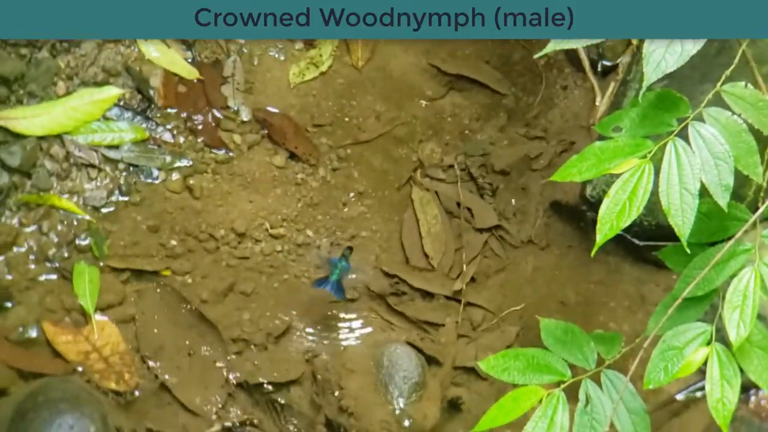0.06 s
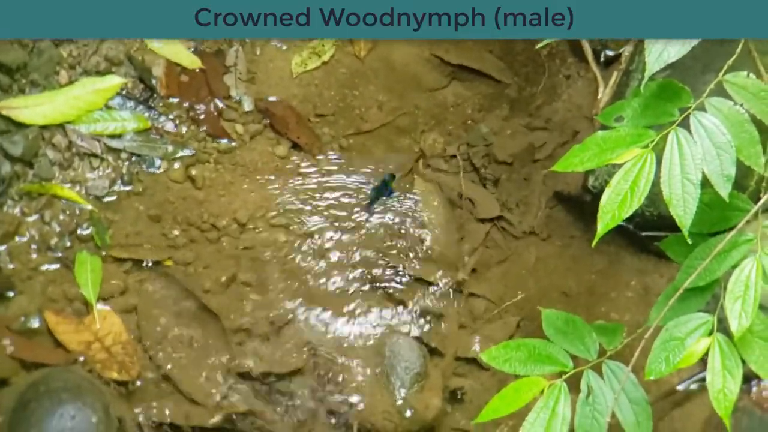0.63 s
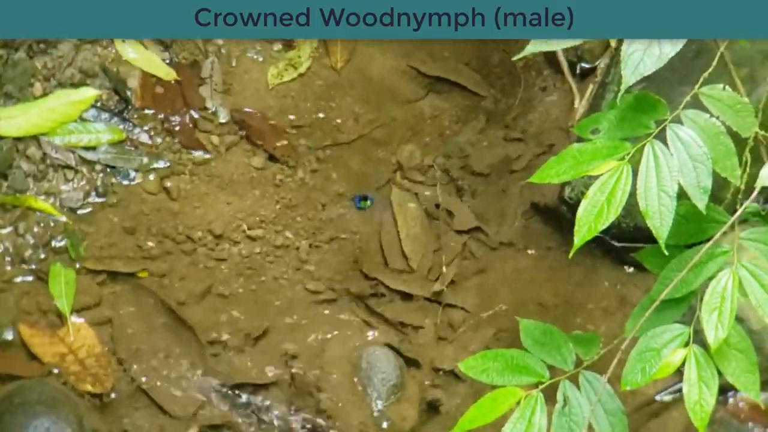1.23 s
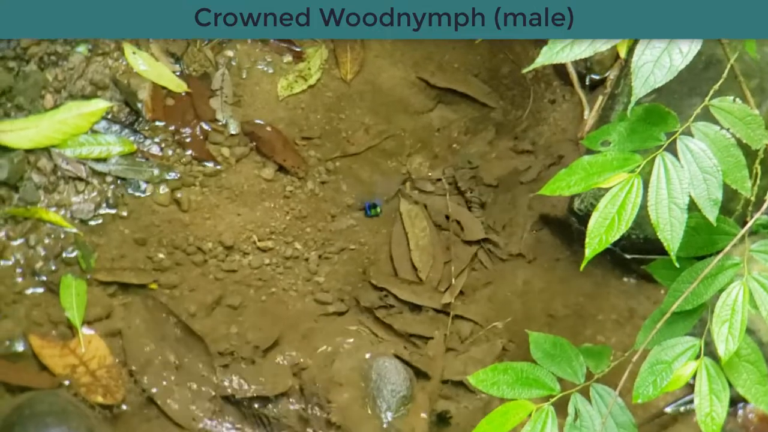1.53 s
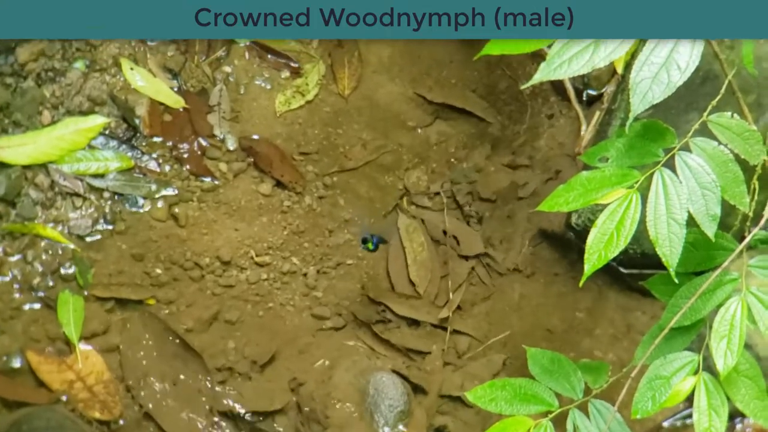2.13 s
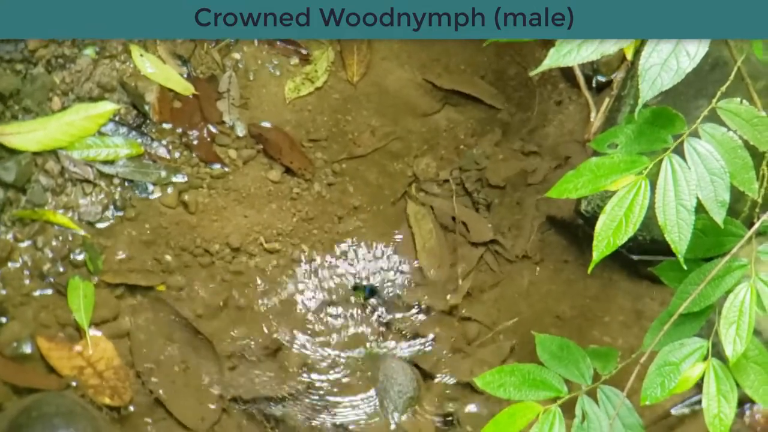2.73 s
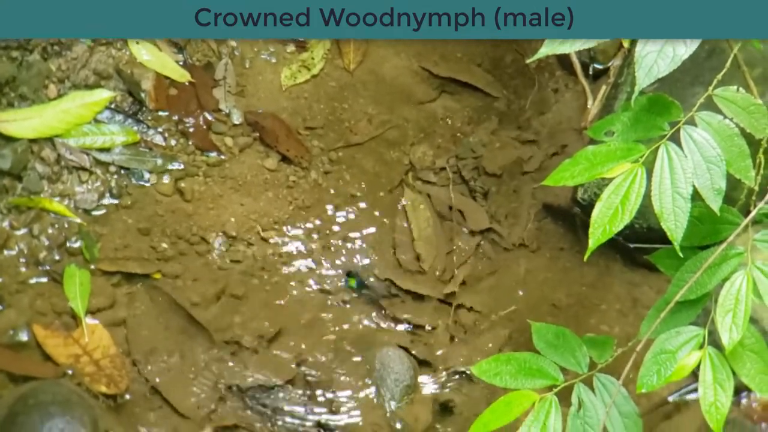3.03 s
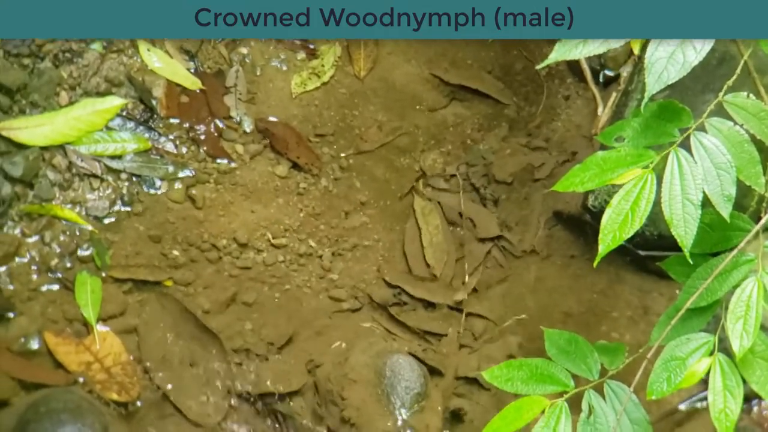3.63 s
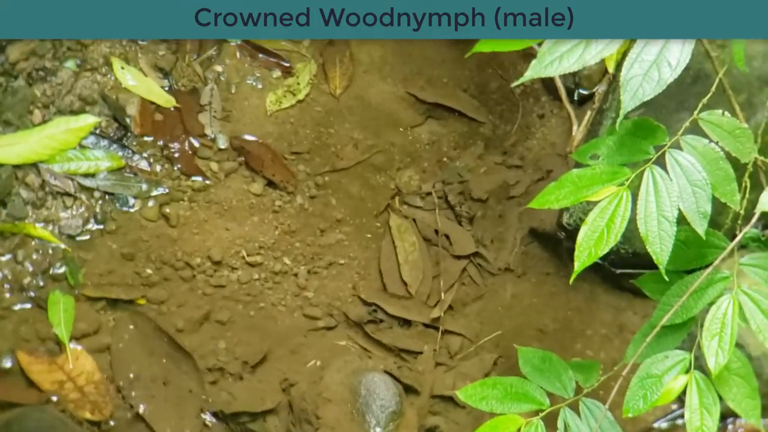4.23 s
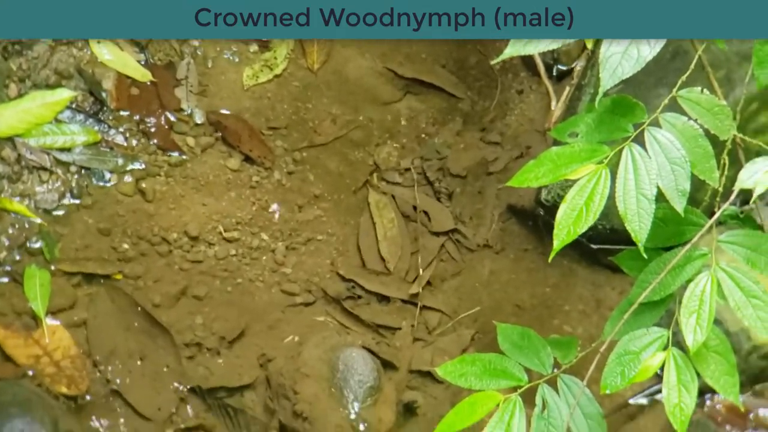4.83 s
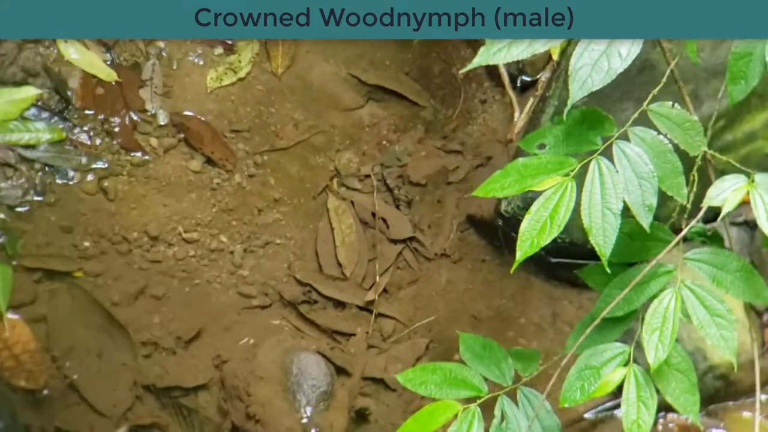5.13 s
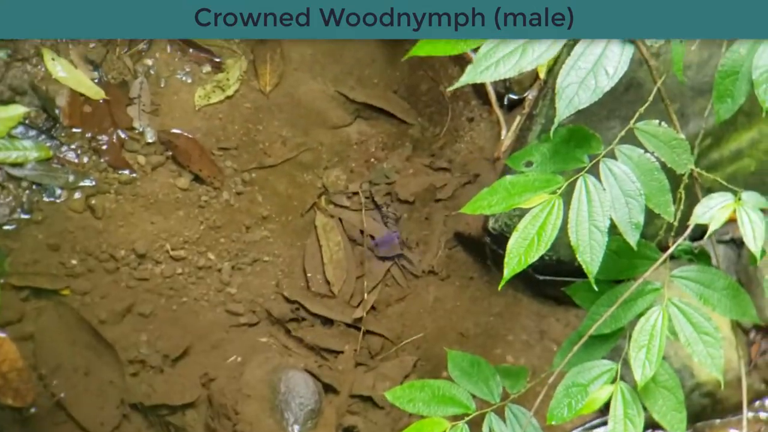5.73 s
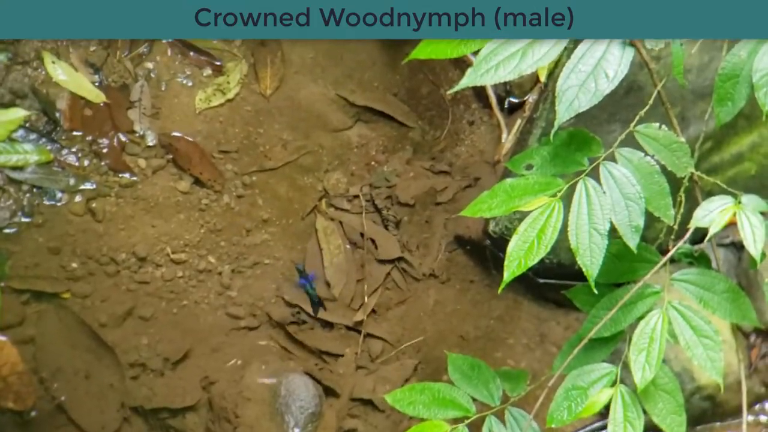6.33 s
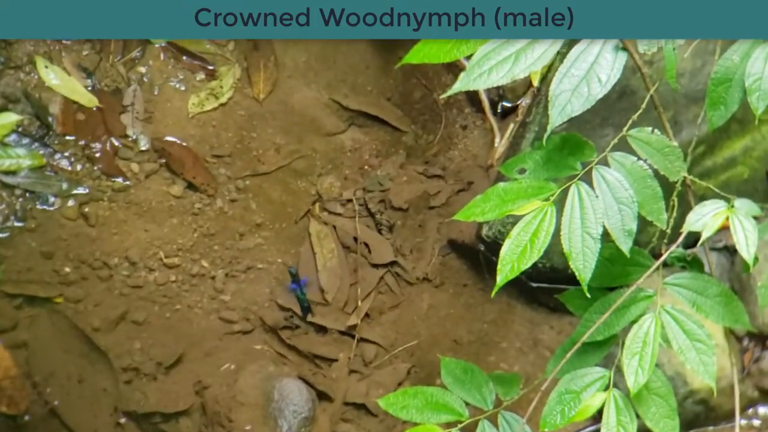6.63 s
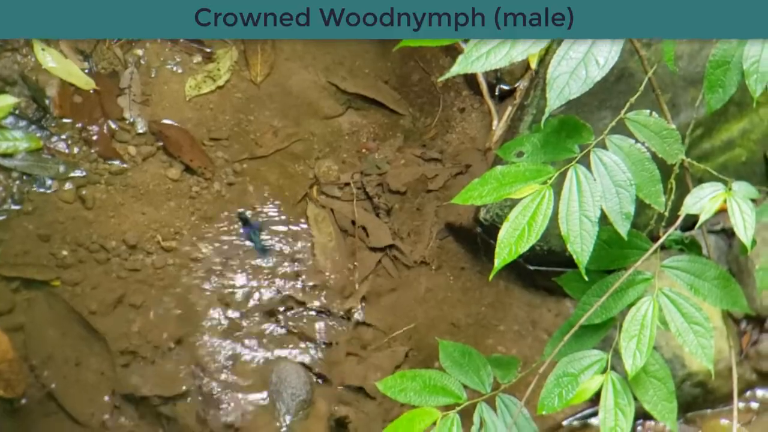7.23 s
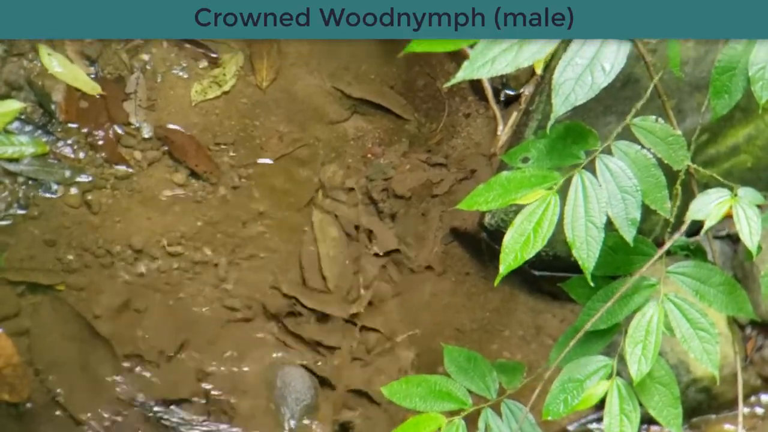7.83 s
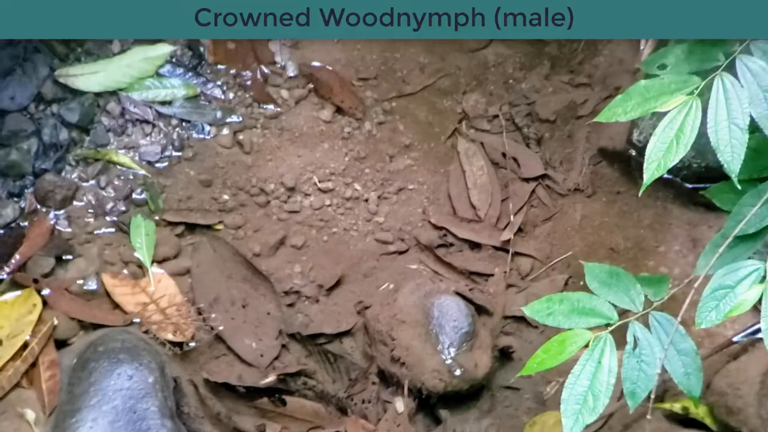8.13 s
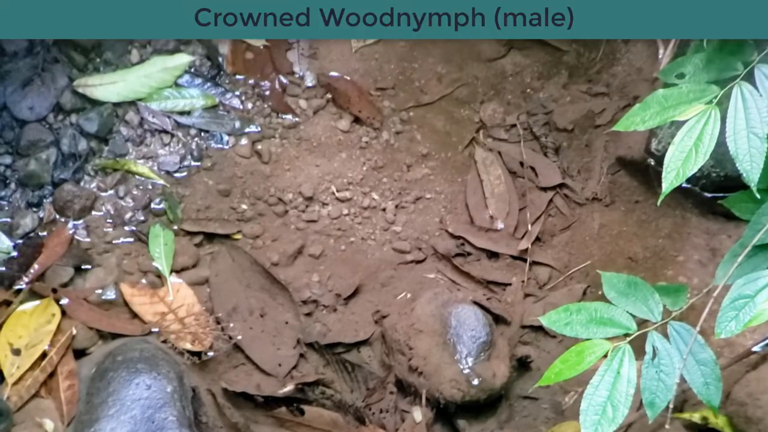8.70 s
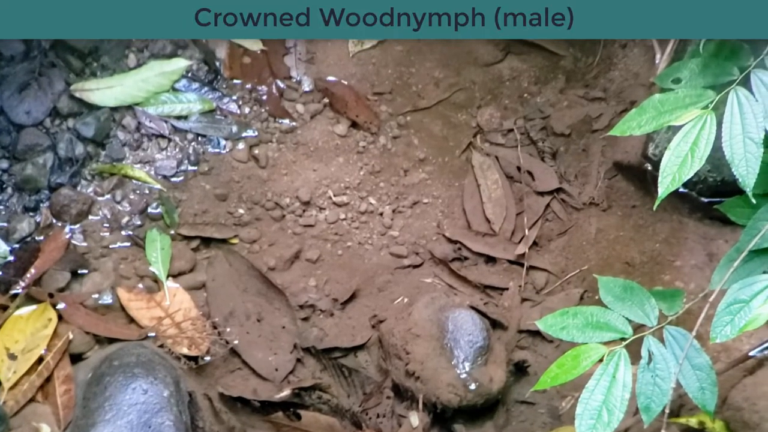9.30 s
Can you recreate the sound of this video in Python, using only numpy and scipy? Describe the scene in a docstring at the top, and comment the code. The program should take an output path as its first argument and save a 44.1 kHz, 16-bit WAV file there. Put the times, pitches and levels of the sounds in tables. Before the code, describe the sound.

In a tropical forest, a steady insect hiss and a fast pulsing katydid sit over gently running water, while birds whistle and peep. Drops land on the microphone with close, sharp ticks and knocks, and a light breeze rumbles on it. Halfway through, the sound switches to cicadas rising and falling in waves, then suddenly drops to a quiet far chorus with a cricket and a faint trickle.

```python
"""Shallow rainforest stream: rush and ringing bubbles, under insect hiss, a katydid, a thin buzz and birds.
At 5.2 s it cuts to a cicada chorus swelling in waves; at 8.1 s that cuts off, leaving a quiet far
chorus, a cricket and a trickle. Drops tap the microphone housing, mostly left; air stirs at its ports."""
import sys
import numpy as np
from scipy import signal
from scipy.fft import rfft, irfft, next_fast_len
from scipy.io import wavfile
from scipy.ndimage import uniform_filter1d, map_coordinates

SR = 44100
rng = np.random.default_rng(int(sys.argv[2]) if len(sys.argv) > 2 else 0)


def unload_wav(signal):
    """Save mono or channel-first audio to the path in sys.argv[1] as 16-bit WAV at rate SR, clipped to [-1, 1]."""
    wavfile.write(
        sys.argv[1],
        SR,
        np.round(np.clip(np.atleast_2d(signal).T, -1, 1) * 32767).astype(np.int16),
    )


N = 417186
WATER_END_S, SWELL_END_S = 5.21, 8.145

# streamside levels: t/s, water trim/dB, insect hiss/dB, katydid/dB
STREAMSIDE_LEVELS = [(0, -59.5, -47.5, -52), (1.5, -60, -47, -52.5), (3.1, -59, -47.5, -51.5),
                     (4, -59.5, -47.5, -50.5), (5.1, -58.5, -47, -54)]
# spectra: f/Hz, relative density/dB
WATER_SPECTRUM = [(350, -51), (480, -13.5), (580, 2), (1000, 0), (1550, -3.5), (3000, -5.5), (7000, -20.5),
                  (15500, -8.5)]
HISS_SPECTRUM = [(1500, -41), (1950, -18.5), (2450, -6), (2850, -0.5), (3350, -5.5), (3800, -0.5),
                 (4500, -2), (5600, -6.5), (7000, -10), (8300, -11.5), (9300, -8.5), (10800, -7.5),
                 (13000, -7), (14600, 0), (15600, -9.5)]
KATYDID_SPECTRUM = [(2000, -26), (4000, 0), (6500, -5.5), (8200, -9), (10800, -4), (13000, -1), (14600, -2),
                    (15600, 3)]
CICADA_SPECTRUM = [(1900, -30), (2400, -7), (2850, 3.5), (3350, -6.5), (3750, 3), (4400, -2.5),
                   (5200, -7.5), (6300, -7.5), (7400, -10), (9800, -4), (10700, -3), (13500, 1),
                   (15000, 2.5), (15600, 0.5)]
FAR_CHORUS_SPECTRUM = [(300, -16), (800, -25.5), (1400, -38), (2100, -17.5), (2750, 0), (3400, -3),
                       (4400, 0), (5100, -8), (5750, 0), (6250, -5), (7000, -13.5), (8200, -20.5),
                       (10500, -13), (13500, -10.5), (15600, -13)]
TRICKLE_SPECTRUM = [(900, -16.5), (1150, -15), (1370, -0.5), (1650, -1), (2050, -5), (2600, -20),
                    (5000, -55)]
AIR_SPECTRUM = [(20, -6), (45, 3), (75, 3.5), (130, -9.5), (250, -12.5), (450, -17), (800, -27),
                (2000, -76)]
# stereo likeness: f/Hz, L-R correlation
WATER_CORRELATION = [(600, 0.48), (1400, 0.41), (3000, 0.63), (7000, 0.06)]
AIR_CORRELATION = [(60, -0.18), (130, 0.45), (300, 0.54)]
# chorus waves: crest t/s, rise/s, fall/s, level/dB
CICADA_WAVES = [(5.16, .09, 0.12, -42.5), (5.56, 0.2, 0.38, -47), (5.88, 0.11, 0.18, -43),
                (6.61, 0.23, 0.18, -41.5), (7.28, 0.11, 0.32, -41.5), (7.98, .13, 0.19, -43)]
# moments when one harmonic of the buzz briefly stands out: centre t/s, harmonic number, boost/dB
BUZZ_BRIGHT_SPELLS = [(.13, 38, 6), (1.89, 37, 14.5), (2.68, 36, 11.5), (2.9, 37, 10), (3.25, 38, 9),
                      (3.79, 36, 11)]
# rising, sagging whistles: t/s, length/s, top f/Hz, relative level/dB
BIRD_WHISTLES = [(0.053, 0.14, 2460, -58.5), (.815, .15, 2490, -57), (1.442, 0.21, 2640, -53),
                 (2.339, 0.15, 2560, -55.5), (3.16, 0.12, 2510, -61.5), (3.455, 0.16, 2590, -54),
                 (4.475, 0.14, 2580, -55)]
# hoarse falling notes: t/s, start f/Hz, relative level/dB
BIRD_SLURS = [(.4, 2490, -57), (1, 2483, -57.5), (1.163, 2310, -58), (1.751, 2380, -58),
              (2.69, 2135, -55.5)]
# thin peeps and a harsh two-tone chip: t/s, length/s, f/Hz, relative level/dB
BIRD_PEEPS = [(.368, .076, 4950, -60), (.591, .27, 3236, -58.5), (.736, 0.21, 3440, -61.5),
              (1.229, .13, 4080, -55.5), (1.599, 0.067, 5370, -51.5), (9.1, .13, 8150, -66)]
BIRD_CHIP = [(1.556, 0.2, 4866, -53.5), (1.58, 0.07, 4010, -51.5)]
# deep falling calls: t/s, length/s, start f/Hz, relative level/dB
BIRD_HOOTS = [(2.787, 0.222, 1079, -51.5), (3.038, 0.32, 1651, -52.5)]
# drops: t/s, tick level/dB, body level/dB, tick f/Hz, knock f/Hz, body L-R/dB
HOUSING_DROPS = [(.405, -51, -49, 500, 300, -21), (2.277, -21.5, -30, 940, 547, 18),
                 (4.0762, -52, -38.5, 500, 222, -18), (4.4544, -20.5, -26, 503, 249, -17),
                 (4.816, -31.5, -39.5, 462, 220, -22), (6.2024, -32.5, -42, 990, 450, 14),
                 (6.2162, -25.5, -31.5, 960, 473, 13), (7.2902, -26, -29.5, 960, 424, 11.5)]
# soft bumps: t/s, relative level/dB
HOUSING_BUMPS = [(7.206, -39.5), (7.323, -33)]
# puffs: centre t/s, half length/s, level/dB
AIR_PUFFS = [(2.2, 0.14, -62), (4.078, 0.071, -54.5), (4.6, 0.45, -57), (7.31, 0.086, -62),
             (7.9, .25, -73.5), (8.925, 0.25, -72.5)]


def stream():
    """Water over stones: an even rush with small bubbles in it."""
    trim_db = curves(STREAMSIDE_LEVELS)[0]
    flow = amp(4.0) * rush(WATER_SPECTRUM, patchy_db=1.0, correlation=WATER_CORRELATION)
    water = flow + amp(-11.5) * bubbles(centre_hz=1000, log_spread=0.414, cycles=19)
    return amp(trim_db) * water * pan(-1.7) * (1 - fade_in(WATER_END_S, 0.014))


def bubbles(centre_hz, log_spread, cycles, count=2400):
    """Tiny bubbles ring down, rising in pitch as they near the surface."""
    start, place = rng.random((2, count, 1))
    pitch, strength = rng.standard_normal((2, count, 1))
    n = np.arange(SR // 50)
    turns = np.clip(centre_hz * np.exp(log_spread * pitch), 600, 6000) * n / SR
    envelope = amp(5.7 * strength - 60 * turns / cycles) * (1 - np.exp(-turns))
    ring = envelope * np.sin(2 * np.pi * turns * (1 + 0.17 * turns / cycles))
    index = ((start * N).astype(int) + n).ravel()
    pair = [np.bincount(index, (ring * np.sqrt(share)).ravel(), N)[:N] for share in (place, 1 - place)]
    return unit(np.array(pair))


def cicadas():
    """Chorus swells and brightens in waves over a steady high shrill."""
    swell = np.sqrt(sum((amp(db) * hump(s, rise, fall)) ** 2 for s, rise, fall, db in CICADA_WAVES))
    dull = filtered(rush(CICADA_SPECTRUM, patchy_db=0.6), lambda hz: resonance(hz, 0, 14700))
    lull = amp(-51) * unit(dull)
    waves = swell * amp(0.45 * wobble(40)) * rush(CICADA_SPECTRUM, patchy_db=1.4)
    chorus = (lull + waves) * pan(0.95) + amp(-56.5) * shrill(centre_hz=9230, width_hz=450)
    return chorus * fade_in(5.11, 0.077) * (1 - fade_in(SWELL_END_S, 0.017))


def bank_insects():
    """Massed insects hiss behind one katydid and one thin buzz."""
    _, hiss_db, katydid_db = curves(STREAMSIDE_LEVELS)
    hiss = amp(hiss_db) * rush(HISS_SPECTRUM, patchy_db=1.1) * pan(1.7)
    return (hiss + katydid(katydid_db) + amp(-64.1) * buzz()) * (1 - fade_in(5.17, 0.13))


def katydid(level_db, stroke_hz=9.7, first_s=0.0586, attack_s=0.0039, decay_s=0.043):
    """Rasping wing strokes: each bites fast and trails off."""
    age_s = ((np.arange(N) / SR - first_s) * stroke_hz + 0.044 * wobble(4)) % 1 / stroke_hz
    stroke = unit((1 - np.exp(-age_s / attack_s)) * np.exp(-age_s / decay_s))
    return amp(level_db + 0.54 * wobble(15)) * stroke * rush(KATYDID_SPECTRUM, patchy_db=3.5) * pan(3.4)


def buzz(start_hz=249.4, rise_hz_per_s=1.45, body_hz=9610, sag_hz_per_s=90, spell_s=0.21, flutter_db=4.6):
    """Quickening tymbal pulses ring an insect's body; single harmonics fade in and out."""
    t = np.arange(N) / SR
    pulse_hz = start_hz + rise_hz_per_s * t
    phase = 2 * np.pi * np.cumsum(pulse_hz) / SR
    out = np.zeros((2, N))
    for k in range(34, 42):
        boost_db = sum(db * np.exp(-(2 * (t - s) / spell_s) ** 4 / 2)
                       for s, harmonic, db in BUZZ_BRIGHT_SPELLS if harmonic == k)
        body = resonance(k * pulse_hz, body_hz - sag_hz_per_s * t, width_hz=560)
        gain = amp(boost_db) - 1 + amp(flutter_db * (wobble(13) - 0.5))
        drift_rad = rng.uniform(0, 2 * np.pi) + 0.89 * np.array([wobble(5.16), wobble(3.26)])
        out += body * gain * np.sin(k * phase + drift_rad)
    return out * (1 - fade_in(5.0, 1.8))


def birds(waver=0.0645, rasp_hz=600, split_hz=1540):
    """One tone a note; rough notes waver and rasp. Low calls carry from deep in the forest."""
    song = np.zeros(N + SR)
    for s, hz, db, rough in bird_notes():
        n = len(hz)
        jitter = lambda rate_hz: wobble(rate_hz, size=SR // 2)[:n]
        phase = 2 * np.pi * np.cumsum(hz * (1 + rough * waver * jitter(300))) / SR
        rasp = jitter(rasp_hz) * np.cos(phase) + jitter(rasp_hz) * np.sin(phase)
        swell = np.sqrt(np.abs(np.sin(np.linspace(0, np.pi, n))))
        song[int(s * SR):][:n] += amp(db) * unit(swell * (np.sin(phase) + 0.92 * rough * rasp))
    low = filtered(song[:N], lambda hz: resonance(hz ** 2, 0, split_hz ** 2))
    high = song[:N] - low
    far = forest_echo(butter(low, 8, 570, 'high'), t60_s=1.66, wet_db=7.5)
    near = forest_echo(high, t60_s=1.0, wet_db=2.5)
    return amp(-7.5) * far + amp(-3.0) * near


def bird_notes(rise_s=0.082, sag_oct_per_s=2.2, slur_s=0.15, hoot_rest_hz=440, hoot_fall_s=0.15):
    """Yield each note: t/s, contour f/Hz, relative level/dB, roughness 0-1."""
    clock = lambda length_s: np.arange(int(length_s * SR)) / SR
    for s, length_s, top_hz, db in BIRD_WHISTLES:
        t = clock(length_s)
        slide = 0.82 ** np.maximum(1 - t / rise_s, 0)
        sag = 2 ** (-sag_oct_per_s * np.maximum(t - rise_s, 0))
        yield s, top_hz * slide * sag, db, 0.25
    arch = np.polyval(np.polyfit([0, 0.5, 1], [1, 0.97, 0.84], 2), clock(slur_s) / slur_s)
    for s, start_hz, db in BIRD_SLURS:
        yield s, start_hz * arch, db, 0.5
    for notes, rough in (BIRD_PEEPS, 0.25), (BIRD_CHIP, 0.784):
        for s, length_s, hz, db in notes:
            yield s, np.full(len(clock(length_s)), hz), db, rough
    for s, length_s, start_hz, db in BIRD_HOOTS:
        fall = np.exp(-clock(length_s) / hoot_fall_s)
        yield s, hoot_rest_hz + (start_hz - hoot_rest_hz) * fall, db, np.linspace(0.855, 0.1, len(fall))


def forest_echo(x, t60_s, wet_db):
    """Trunks and leaves scatter sound into a diffuse stereo tail."""
    t = np.arange(SR) / SR
    tail = rng.standard_normal((2, SR)) * amp(-60 * t / t60_s)
    tail /= np.linalg.norm(tail, axis=1, keepdims=True)
    return x + amp(wet_db) * signal.fftconvolve(x[None], tail, axes=1)[:, :N]


def drops(tick_t60_s=0.011, knock_t60_s=0.0089, thud_t60_s=0.027, thud_hz=136, bump_hz=70):
    """Drops splat and tick by the left port, knock the hollow, thud the housing; bumps only thud."""
    out, t = np.zeros((2, N + SR)), np.arange(SR // 8) / SR
    ring = lambda hz, t60_s: np.sin(2 * np.pi * hz * t) * amp(-60 * t / t60_s)
    thud = lambda hz, attack_s: ring(hz, thud_t60_s) * (1 - np.exp(-t / attack_s))
    for s, tick_db, body_db, tick_hz, knock_hz, side_db in HOUSING_DROPS:
        spray = unit(butter(rng.standard_normal(len(t)), 4, 2900, 'low'))
        splat = amp(-15) * spray * (amp(-60 * t / 0.015) + amp(-10 - 60 * t / 0.15))
        shell = amp(tick_db) * (ring(tick_hz, tick_t60_s) + splat) * amp([[0], [-18]])
        body = ring(knock_hz, knock_t60_s) + amp(-3) * thud(thud_hz, attack_s=0.0019)
        out[:, int(s * SR):][:, :len(t)] += shell + amp(body_db) * body * pan(side_db)
    for s, db in HOUSING_BUMPS:
        out[:, int(s * SR):][:, :len(t)] += amp(db) * thud(bump_hz, attack_s=0.0033) * pan(14)
    return butter(out[:, :N], 3, 85, 'high')  # ports leak slow pressure


def far_forest(cricket_pulse_hz=28):
    """Distant insects, a faint trickle on the left, later a pulsing cricket."""
    chorus = amp(-58.0) * rush(FAR_CHORUS_SPECTRUM, patchy_db=1.06) * pan(1.0)
    trickle = amp([[-70], [-88]]) * rush(TRICKLE_SPECTRUM, patchy_db=1.5)
    pulsing = 1 + 0.56 * np.sin(2 * np.pi * cricket_pulse_hz * np.arange(N) / SR + wobble(2.6))
    cricket = amp(-74.5) * pulsing * shrill(centre_hz=6620, width_hz=45)
    return (chorus + trickle) * fade_in(WATER_END_S, 0.015) + cricket * fade_in(SWELL_END_S, 0.015)


def air(breeze_db=-67.5, calm_db=-84.5):
    """Moving air rumbles at the ports, with a few puffs."""
    steady = amp(calm_db) + amp(breeze_db) * (1 - fade_in(WATER_END_S, 0.4))
    puff_power = sum((amp(db) * hump(s, half_s, half_s)) ** 2 for s, half_s, db in AIR_PUFFS)
    gain = np.sqrt(steady ** 2 + puff_power) * amp(0.83 * wobble(9))
    return gain * rush(AIR_SPECTRUM, patchy_db=3.0, correlation=AIR_CORRELATION)


def rush(spectrum, patchy_db, correlation=((1000, 0),)):
    """Stereo noise, rms 1, with time-frequency patches of random gain."""
    bins = signal.stft(rng.standard_normal((2, N)), nperseg=512)[2]
    patches = uniform_filter1d(rng.standard_normal(bins.shape[1:]), size=5, axis=0)
    patches = unit(uniform_filter1d(patches, size=12, axis=1))
    pair = signal.istft(bins * amp(patchy_db * patches), nperseg=512)[1][:, :N]
    angle = lambda hz: np.arccos(np.clip(along(correlation, hz), -1, 1)) / 2
    response = lambda hz: amp(along(spectrum, hz)) * [np.cos(angle(hz)), np.sin(angle(hz))]
    mid, side = filtered(pair, response)
    return unit(np.array([mid + side, mid - side]))


def shrill(centre_hz, width_hz):
    """Insects of one kind blur into a narrow band, rms 1."""
    return unit(filtered(rng.standard_normal((2, N)), lambda hz: resonance(hz, centre_hz, width_hz)))


def resonance(hz, centre_hz, width_hz):
    """Peak gain 1, halved at width_hz off centre."""
    return 1 / (1 + ((hz - centre_hz) / width_hz) ** 2)


def filtered(x, response):
    """Zero-phase filter; response maps Hz to gain."""
    m = next_fast_len(N + SR // 2)
    return irfft(rfft(x, m) * response(np.fft.rfftfreq(m, 1 / SR)), m)[..., :N]


def butter(x, order, cutoff_hz, kind):
    """Causal low- or high-pass."""
    return signal.sosfilt(signal.butter(order, cutoff_hz, kind, fs=SR, output='sos'), x)


def along(points, hz):
    """Interpolate (f/Hz, value) on a log axis."""
    f, values = np.transpose(points)
    return np.interp(np.log(hz + 1), np.log(f + 1), values)


def curves(rows):
    """Per-sample curve for each column after t/s."""
    times_s, *columns = np.transpose(rows)
    return [np.interp(np.arange(N) / SR, times_s, column) for column in columns]


def fade_in(centre_s, length_s):
    """Linear ramp, 0 to 1."""
    return np.clip((np.arange(N) / SR - centre_s) / length_s + 0.5, 0, 1)


def hump(crest_s, rise_s, fall_s):
    """Bell-shaped gain."""
    since_s = np.arange(N) / SR - crest_s
    return np.exp(-(since_s / np.where(since_s < 0, rise_s, fall_s)) ** 2)


def wobble(rate_hz, size=N):
    """Smooth random curve."""
    knots = rng.standard_normal(int(size * rate_hz / SR) + 4)
    return map_coordinates(knots, [np.arange(size) * rate_hz / SR])


def pan(left_lead_db):
    """L and R gains."""
    return amp([[left_lead_db / 2], [-left_lead_db / 2]])


def amp(db):
    """dB to gain."""
    return 10 ** (np.asarray(db) / 20)


def unit(x):
    """Scale to rms 1."""
    return x / np.sqrt(np.mean(x ** 2) + 1e-20)


def scene():
    """Sum of water, insects, birds, drops and air."""
    insects = bank_insects() + cicadas() + far_forest()
    taps = drops()
    return stream() + insects + birds() + taps + air()


def record(dry):
    """Band limit, 15720 Hz."""
    return filtered(dry, lambda hz: hz < 15720)


dry = scene()
out = record(dry)
unload_wav(out)
```